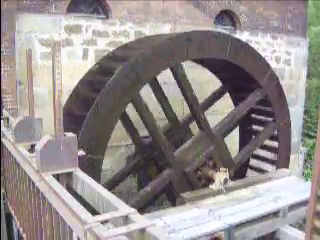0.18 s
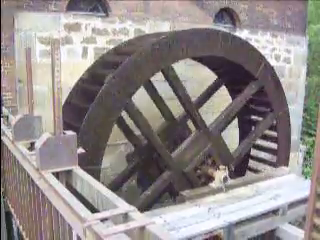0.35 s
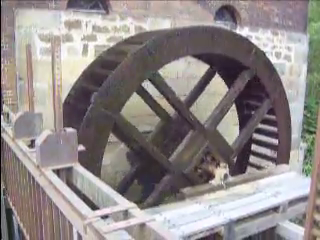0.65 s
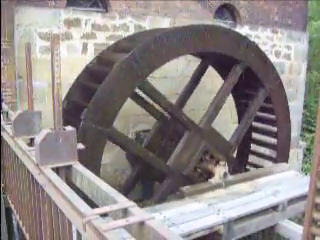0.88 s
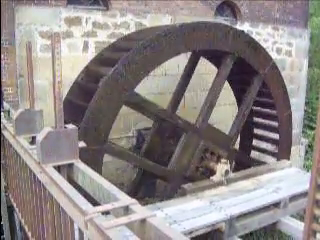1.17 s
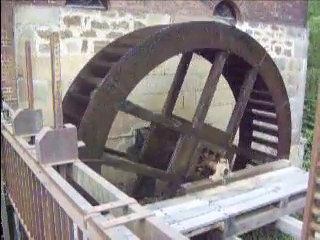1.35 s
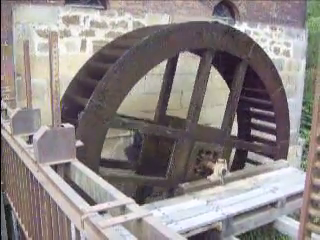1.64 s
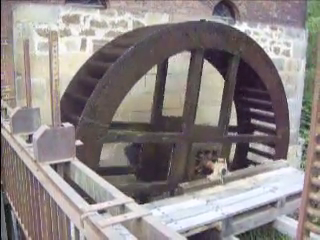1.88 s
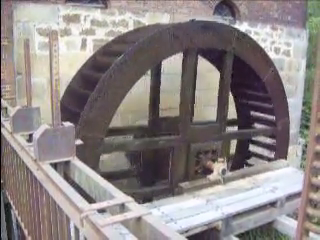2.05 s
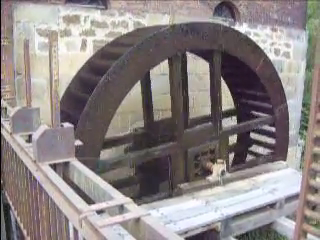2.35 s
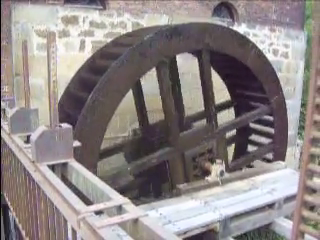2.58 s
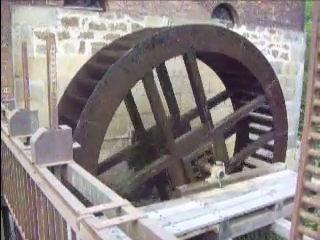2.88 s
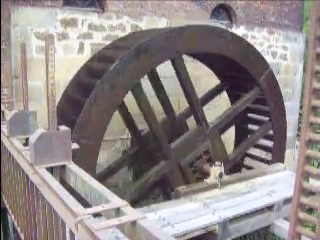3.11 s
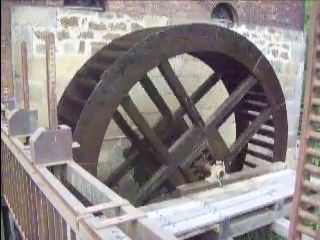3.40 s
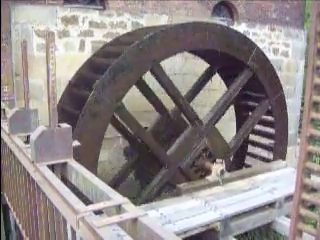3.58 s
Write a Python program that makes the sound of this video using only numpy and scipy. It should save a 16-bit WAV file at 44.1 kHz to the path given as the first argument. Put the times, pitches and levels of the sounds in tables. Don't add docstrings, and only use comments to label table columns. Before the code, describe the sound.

Water tumbles steadily over a turning wheel outdoors beside a stone wall, with low surges and hollow slops; after two seconds come trembling bird whistles and tiny squeaks. Cheap camera microphone, opening thump, slight whine and hiss.

```python
import sys
import numpy as np
from scipy import signal
from scipy.fft import rfft, irfft
from scipy.io import wavfile

SR = 44100
rng = np.random.default_rng(int(sys.argv[2]) if len(sys.argv) > 2 else 0)


def master_out(mix):
    frames = np.transpose(np.atleast_2d(mix))
    ceiling = np.clip(frames, -1, 1)
    pcm = np.round(ceiling * 32767).astype(np.int16)
    wavfile.write(sys.argv[1], SR, pcm)


def invert_db(x):
    u = np.asarray(x, float) / 20
    return 10 ** u


N = 164934


def rms_one(x):
    return x / np.sqrt(np.mean(x ** 2) + 1e-20)


def clock():
    return np.arange(N) / SR


def drift(rate_hz):
    pole = np.exp(-80 * np.pi * rate_hz / SR)
    white = rng.standard_normal(N // 40 + 2002)
    slow = signal.lfilter([1], [1, -2 * pole, pole * pole], white)[2000:]
    return np.interp(np.arange(N) / 40, np.arange(len(slow)), rms_one(slow))


def ring(clicks, hz, t60_s):
    radius = invert_db(-60 / (t60_s * SR))
    w = 2 * np.pi * hz / SR
    return signal.lfilter([0, np.sin(w)], [1, -2 * radius * np.cos(w), radius * radius], clicks + 1e-18)


def banded_noise(spectrum, surge, shared_db, own_db):
    hz, db = np.transpose(spectrum)
    edges_hz = hz[0] * 2 ** np.arange(0, np.log2(hz[-1] / hz[0]) + 1 / 3, 1 / 3)
    edges_hz = edges_hz[edges_hz < 0.4 * SR]
    white = rng.standard_normal((2, N))
    out = 0
    for k, (low_hz, high_hz) in enumerate(zip(edges_hz, edges_hz[1:])):
        band_pass = signal.butter(2, [low_hz, high_hz], "band", fs=SR, output="sos")
        band = signal.sosfilt(band_pass, white[k % 2])
        level_db = np.interp(np.log(low_hz * high_hz) / 2, np.log(hz), db)
        out = out + band * invert_db(level_db + shared_db * surge + own_db * drift(7.3))
    return rms_one(out)


def grains(per_s, low_hz, high_hz, cycles, spread_db):
    sizes = invert_db(spread_db * np.minimum(rng.exponential(1, N), 4)) * rng.choice([-1, 1], N)
    clicks = sizes * (rng.random(N) < per_s / SR)
    pitch_index = rng.integers(0, 16, N)
    out = 0
    for k, hz in enumerate(np.geomspace(low_hz, high_hz, num=16)):
        out = out + ring(clicks * (pitch_index == k), hz, cycles / hz)
    return rms_one(out)


def roar(surge):
    # frequency in Hz, density in dB per Hz.
    roar_spectrum = [(12, -32), (20, 2), (93, -3.5), (124, -3), (151, -8), (206, -0.5), (251, -11),
                     (545, -0.5), (1500, -16.5), (1950, -67), (3300, -120)]
    return invert_db(-35) * banded_noise(roar_spectrum, surge, shared_db=0.2, own_db=0.44)


def spray(surge):
    # frequency in Hz, density in dB per Hz.
    spray_spectrum = [(900, -14), (1300, -8), (2310, 0), (2950, -7), (4290, -3.5), (5530, -9),
                      (9900, -10.5), (14000, -11.5)]
    return invert_db(-38.12) * banded_noise(spray_spectrum, surge, shared_db=0.43, own_db=0.66)


def hollows():
    # frequency in Hz, width in Hz, level in dB.
    resonances = [(208, 23, -42), (582, 200, -44.5), (146, 17, -47), (307, 52, -46.5), (980, 260, -46),
                  (810, 170, -48)]
    out = 0
    for hz, width_hz, db in resonances:
        tone = rms_one(ring(rng.standard_normal(N), hz, 2.6 / width_hz))
        out = out + invert_db(db + 1.35 * drift(7.7)) * tone
    return out


def bubbles():
    gurgle = grains(per_s=90, low_hz=145.4, high_hz=1070, cycles=16, spread_db=0.0)
    fizz = grains(per_s=2500, low_hz=1600, high_hz=9000, cycles=4.2, spread_db=-1.0)
    return invert_db(-41) * gurgle + invert_db(-45.5) * fizz


def water():
    surge = 0.25 * drift(3.3) + 0.26 * drift(25.0)
    return roar(surge) + spray(surge) + hollows() + bubbles()


def gusts():
    # start in seconds, length in seconds, level in dB.
    gust_events = [
        (0.543, 0.23, -36),
        (1.031, .12, -37),
        (1.484, 0.21, -33),
        (2.05, 0.32, -38.5),
        (2.51, 0.27, -43),
        (3.147, 0.11, -36.5),
    ]
    band_pass = signal.butter(2, [18, 168], "band", fs=SR, output="sos")
    rumble = rms_one(signal.sosfilt(band_pass, rng.standard_normal(N)))
    shape = 0
    for start_s, length_s, db in gust_events:
        u = np.clip((clock() - start_s) / length_s, 0, 1)
        shape = shape + invert_db(db) * np.sin(np.pi * u ** 0.77)
    return shape * rumble


def slops_and_bumps():
    # start in seconds, pitch in Hz, peak level in dB, t60 in seconds.
    slop_and_bump_events = [
        (1.35, 195, -29, .12),
        (1.51, 28, -26, .3),
        (1.865, 208, -26, .12),
        (2.98, 203, -28, .12),
        (3.46, 26, -28, .2),
    ]
    out = 0
    for start_s, hz, db, t60_s in slop_and_bump_events:
        t = np.maximum(clock() - start_s, 0)
        swell = 1 - np.exp(-t * hz / 1.3)
        out = out + invert_db(db - 60 * t / t60_s) * swell * np.sin(2 * np.pi * hz * t)
    return out


def bird():
    # time in seconds, pitch in Hz, level in dB.
    low_notes = [
        [(2.266, 2880, -52), (2.276, 2840, -41), (2.287, 2770, -40), (2.3, 2550, -46), (2.32, 2280, -45),
         (2.336, 1970, -41), (2.346, 1930, -41), (2.355, 1900, -52)],
        [(2.355, 1860, -52), (2.385, 1820, -47), (2.42, 1870, -46), (2.45, 1970, -42), (2.51, 2030, -40),
         (2.54, 1990, -41), (2.547, 1980, -54)],
        [(3.145, 1720, -52), (3.158, 1750, -46), (3.2, 1830, -44), (3.255, 1900, -43), (3.31, 1960, -41),
         (3.38, 1985, -40), (3.425, 1955, -41), (3.445, 1850, -50)],
    ]
    high_notes = [
        [(2.664, 2120, -52), (2.685, 2130, -41), (2.72, 2320, -44), (2.74, 2470, -48), (2.752, 2510, -38),
         (2.776, 2550, -38), (2.787, 2580, -49), (2.8, 2605, -37), (2.86, 2645, -35)],
        [(2.86, 2600, -44), (2.895, 2420, -47), (2.91, 2430, -53), (2.93, 2500, -47), (2.96, 2580, -55)],
        [(3.55, 2370, -55), (3.578, 2570, -46), (3.592, 2700, -41), (3.602, 2780, -40), (3.614, 2690, -46)],
        [(3.612, 2510, -46), (3.625, 2630, -42), (3.638, 2730, -35), (3.665, 2720, -36), (3.672, 2680, -50)],
    ]
    # tremble rate in Hz, depth 0-1, pitch swing in Hz, time of one dip in seconds.
    trembles = [(35, .35, 20, 2.298), (67, .6, 40, 2.53), (38.3, .6, 30, 3.352), (45, .15, 8, 2.845),
                (30, .1, 0, 2.9), (30, .1, 0, 3.6), (30, .1, 0, 3.6)]
    t = clock()
    out = 0
    for note, (rate_hz, depth, swing_hz, dip_s) in zip([*low_notes, *high_notes], trembles):
        note_s, note_hz, note_db = np.transpose(note)
        turn = 2 * np.pi * rate_hz * (t - dip_s)
        pitch_hz = np.interp(t, note_s, note_hz) - swing_hz * np.sin(turn) + 16 * drift(40.0)
        level = invert_db(np.interp(t, note_s, note_db) + 1.2 * drift(45.0))
        level = level * (1 - depth * np.cos(turn))
        level = level * (t > note_s[0]) * (t < note_s[-1])
        out = out + np.sqrt(2) * level * np.sin(2 * np.pi * np.cumsum(pitch_hz) / SR)
    lag = int(0.047 * SR)
    return out + invert_db(-18) * np.r_[np.zeros(lag), out[:-lag]]


def axle():
    # start in seconds, length in seconds, pitch in Hz, level in dB.
    squeaks = [
        (2.12, .026, 1810, -42),
        (2.152, .028, 1660, -43),
        (3.01, .04, 2500, -48),
        (3.055, .04, 2450, -45),
        (3.18, .04, 2620, -45),
    ]
    sag = 0.04
    out = 0
    for start_s, length_s, hz, db in squeaks:
        u = np.clip((clock() - start_s) / length_s, 0, 1)
        cycles = hz * length_s * (u - sag * u * u / 2)
        out = out + invert_db(db + 2) * np.sin(np.pi * u) * np.sin(2 * np.pi * cycles)
    return out


def switch_on_thump(on_s):
    slow = 0.33 * np.exp(-on_s / 0.1)
    fast = (0.095 + 28 * on_s) * np.exp(-on_s / 0.012)
    return slow + fast


def camera_gain_db():
    # time in seconds, gain in dB.
    gain_curve = [(.036, -28), (.12, -23.5), (.24, -16.5), (.46, -9.5), (.72, -3), (.9, -0.1), (1.1, -0.8),
                  (2.2, -0.5), (3.74, -0.45)]
    return np.interp(clock(), *np.transpose(gain_curve))


def camera_whine(gain_db):
    # frequency in Hz, rms level in dB.
    whine_tones = [(4942, -65), (9884, -67.5)]
    tones = sum(np.sqrt(2) * invert_db(db) * np.sin(2 * np.pi * hz * clock()) for hz, db in whine_tones)
    return tones * invert_db(0.26 * gain_db)


def camera_hiss():
    return invert_db(-64) * rng.standard_normal(N)


def half_rate(x):
    # frequency in Hz, gain in dB.
    smoothing = [(9800, 0), (10500, -1.5), (11025, -6), (11500, -13), (12000, -23), (12380, -37),
                 (12440, -80)]
    hz = np.fft.rfftfreq(N, 1 / SR)
    below_mirror = irfft(rfft(x) * (hz < SR / 4), N)
    kept = below_mirror * (np.arange(N) % 2 == 0) * 2
    response = invert_db(np.interp(hz, *np.transpose(smoothing))) * (hz < smoothing[-1][0])
    return irfft(rfft(kept) * response, N)


def top_cut(x):
    hz = np.fft.rfftfreq(N, 1 / SR)
    return irfft(rfft(x) * np.clip((16900 - hz) / 1500, 0, 1), N)


def scene():
    return (water() + gusts() + slops_and_bumps() + bird() + axle())[None]


def low_pass(x):
    return signal.sosfilt(signal.butter(12, 16900, fs=SR, output="sos"), x)


def record(dry):
    gain_db = camera_gain_db()
    x = half_rate(dry * invert_db(gain_db) + camera_whine(gain_db) + camera_hiss())
    since_on_s = clock() - 1600.5 / 44100
    x = x + switch_on_thump(np.maximum(since_on_s, 0))
    x = x * np.clip(since_on_s * SR + 0.5, 0, 1)
    return low_pass(top_cut(x))


dry = scene()
out = record(dry)
master_out(out)
```